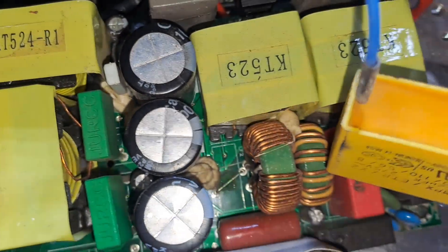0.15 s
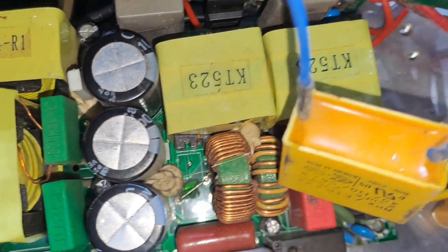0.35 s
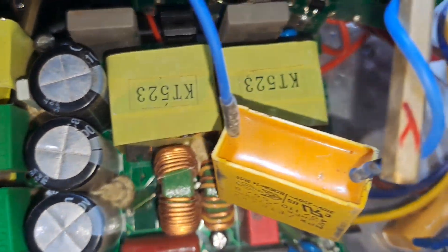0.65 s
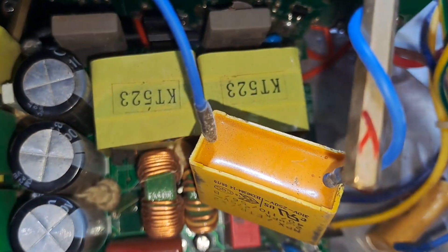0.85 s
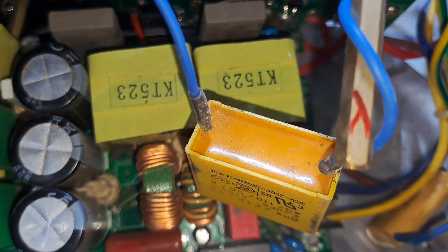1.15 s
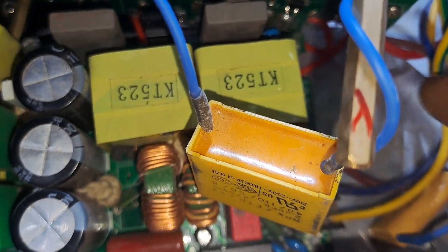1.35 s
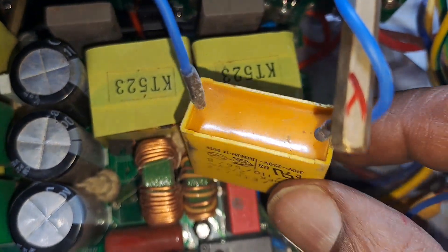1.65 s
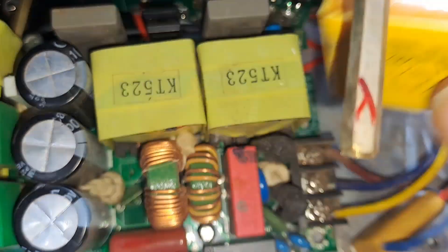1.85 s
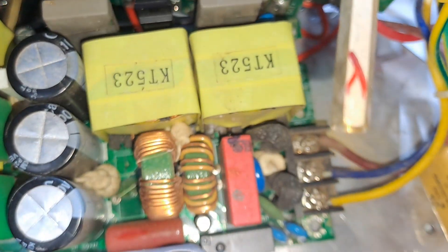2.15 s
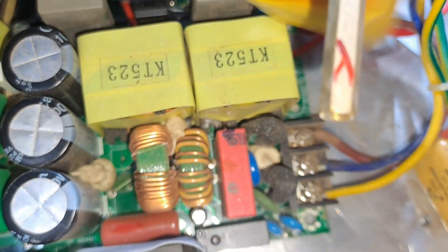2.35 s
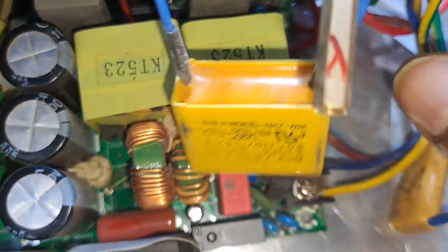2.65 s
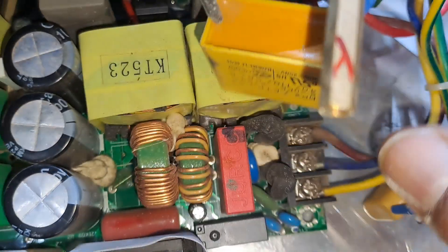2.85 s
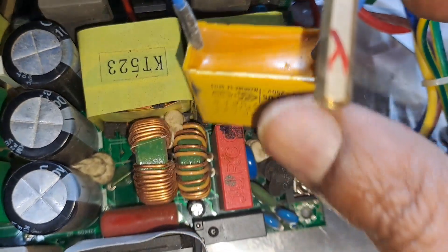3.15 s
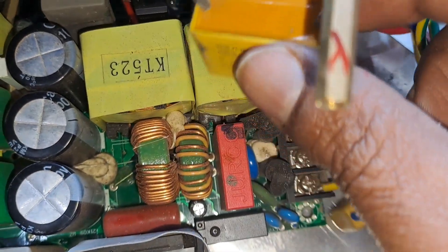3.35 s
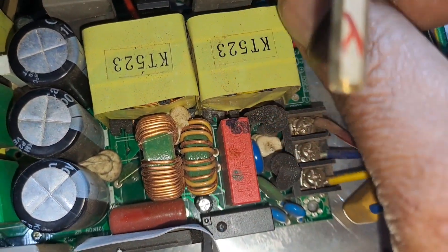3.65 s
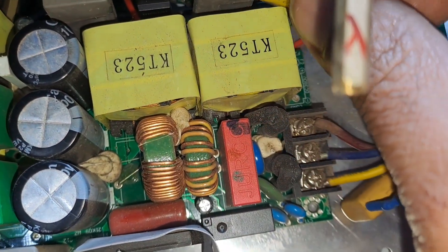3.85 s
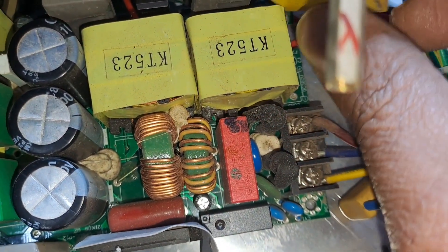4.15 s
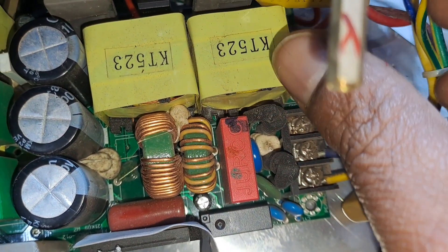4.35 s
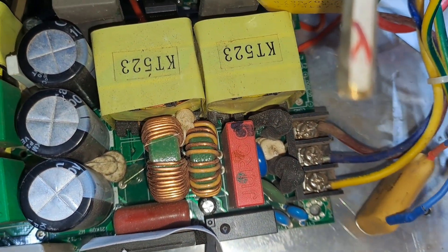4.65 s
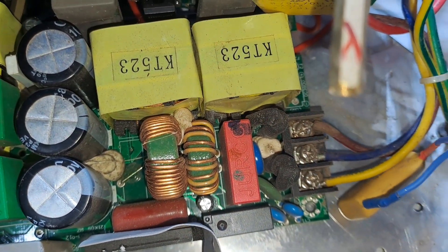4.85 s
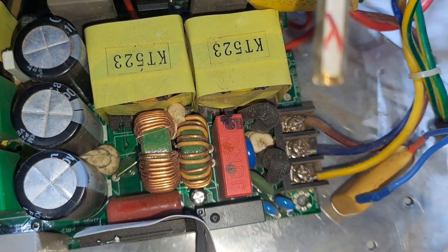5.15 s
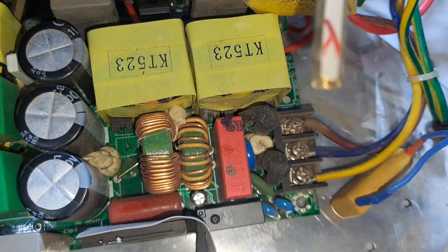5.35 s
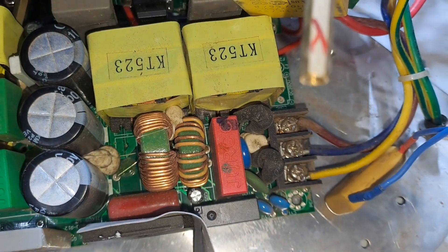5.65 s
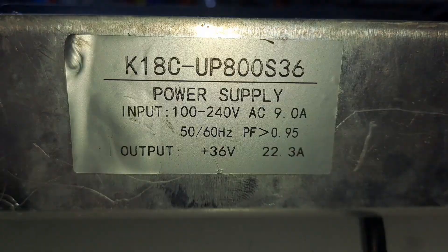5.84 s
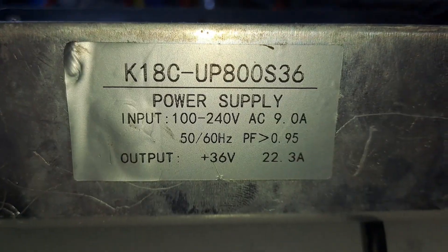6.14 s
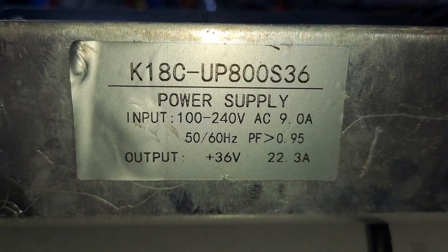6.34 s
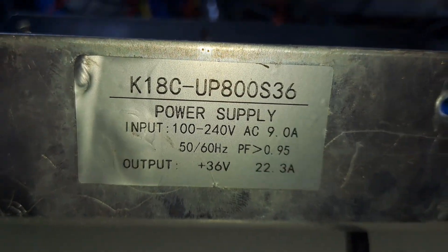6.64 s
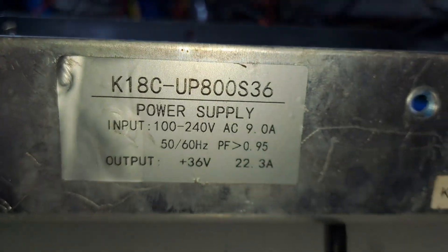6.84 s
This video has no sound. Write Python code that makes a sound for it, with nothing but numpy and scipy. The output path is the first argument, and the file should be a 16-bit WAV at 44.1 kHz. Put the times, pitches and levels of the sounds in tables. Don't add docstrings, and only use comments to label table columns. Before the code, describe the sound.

Close, dry clacks of hard plastic on metal and circuit board, gritty wire scrapes, one sharp microphone tick and a short dull shove.

```python
import sys
import numpy as np
from scipy import signal
from scipy.fft import rfft, irfft, next_fast_len
from scipy.io import wavfile
from scipy.ndimage import uniform_filter1d, map_coordinates

SR = 44100
rng = np.random.default_rng(int(sys.argv[2]) if len(sys.argv) > 2 else 0)


def waveform_to_disk(signal):
    frames = np.transpose(np.atleast_2d(signal))
    scaled = np.clip(frames, -1, 1) * 32767
    samples = np.round(scaled).astype(np.int16)
    wavfile.write(sys.argv[1], SR, samples)


def to_linear_factor(level_db):
    exponent = np.asarray(level_db, float) / 20
    return 10 ** exponent


N = 308391

# start_s, peak_db, left_minus_right_db, body_db (under 1.3 kHz), clink_db (over 2.7 kHz)
BAR_HITS = [(1.42, -25, 0.5, -12.5, -19.5), (1.577, -21.5, -0.5, -15, -18.5), (1.722, -32.5, 2, -13, -42.5),
            (1.745, -26, 2, -7, -19), (1.938, -32.5, 3.5, -11.5, -4), (2.024, -41.5, 3, 0, -11),
            (2.035, -6.5, 1.5, -20.5, -6), (3.297, -29.5, 6.5, -9.5, -14), (3.349, -19, 5.5, -12.5, -24),
            (3.398, -30.5, 8, -6.5, -22.5), (3.41, -30.5, 7, -19.5, -15), (3.463, -37.5, 4.5, -7, -18),
            (4.637, -38.5, 5, -13.5, -21)]
BOARD_HITS = [(2.477, -36, 5.5, -9, -10), (3.148, -41.5, -6.5, -3.5, -9), (3.157, -21.5, 5, -13.5, -17),
              (3.512, -37.5, -7, -21, -6.5), (3.526, -15.5, 7, -14.5, -17), (3.542, -21, -3, -10.5, -2.5),
              (3.554, -26.5, 9.5, -15.5, -16), (3.575, -23, 8.5, -20.5, -7.5), (3.604, -27, -3, -8.5, 0.5),
              (3.647, -6, 3, -19.5, -6.5), (3.755, -32, 9, -16, -18.5), (4.063, -22, 5, -7, -13),
              (4.22, -19, 4, -11, -21)]
TRAY_HITS = [
    (1.107, -38, -5.5, -20, -6),
    (1.227, -22.5, -2.5, -3.5, -13),
    (1.755, -37, 14.5, -11.5, -22),
    (3.848, -17, -3, 1, -25),
    (3.857, -23, 6, -2, -40),
    (4.344, -12, -1, -4, -17),
    (4.358, -16, -8, -15, -30.5),
    (4.367, -23, 1.5, -5, -20),
]
WIRE_TICKS = [
    (1.112, -27, -5.5, -25, -10),
    (1.136, -33.5, -0.5, -4, -6),
    (1.319, -39, -9, -14, -6.5),
    (1.342, -39, -7.5, -18, -2.5),
    (2.776, -18, -8.5, -30, -13.5),
    (4.52, -41.5, -7.5, -17, -11),
    (4.562, -29.5, -15.5, -30, -14.5),
    (5.648, -52, -11, -0.5, -16),
]
# pitch_hz, level_db, t60_s (time to fall 60 dB)
BAR_MODES = [(1050, -4, 0.1), (1212, -6, 0.047), (1914, -9.5, 0.059), (2329, -17, 0.059),
             (3190, -8.5, 0.038), (3980, 10.5, 0.028), (4300, -15.5, 0.029), (5320, -1.5, 0.065),
             (6000, 1, 0.02), (6337, -6, 0.078)]
BOARD_MODES = [(1042, 10, 0.079), (1200, -10, 0.028), (1475, 7.5, 0.059), (1893, -6, 0.04),
               (2630, -15, 0.04), (3100, -12, 0.045), (3270, 0, 0.045), (4210, -6, 0.038), (6000, -4, .02),
               (6770, 0.5, 0.03)]
TRAY_MODES = [(270, -15, 0.076), (669.6, 1, 0.045), (791, -2, 0.08), (880, 7, 0.09), (1094, -3, 0.062),
              (1280, -2.5, 0.042), (2010, -1, 0.02), (2177, -17, 0.06), (3000, -11, 0.016),
              (4398, -8, 0.0347)]
WIRE_MODES = [(2900, -8, .015), (3870, -14, .05), (4790, -6, .012), (5600, -10, .012), (7200, -10, .01),
              (11800, -8, .012)]
# base_db, change_per_clink (dB per dB), change_per_body (dB per dB)
BAR_EDGE = (-34, 0.13, .05)
BOARD_EDGE = (-18, 0.85, -0.33)
TRAY_EDGE = (-30, 1, -.5)
WIRE_EDGE = (-15.5, -0.056, -0.52)

# start_s, peak_db, pitch_hz
BUMPS = [(2.094, -32, 987), (2.161, -38.5, 1230), (2.174, -28, 1035), (2.189, -33.5, 1056),
         (2.287, -39, 990), (2.3, -30, 1027), (2.316, -35, 1050), (2.388, -37.5, 1200), (2.411, -40.5, 791),
         (2.448, -34, 788), (2.474, -34, 1200), (2.496, -41, 796)]
BUMP_T60_S, BUMP_SIDE_DB = 0.045, 2.5

# start_s, end_s, level_db, tilt_db (per octave), left_minus_right_db
DRAGS = [
    (1.04, 1.09, -48, 8, -5),
    (2.385, 2.435, -48.5, 4, 7.5),
    (2.475, 2.505, -52.5, 7, 9.5),
    (2.515, 2.54, -48.5, 9, 8.5),
    (2.74, 2.757, -47.5, 5, 3.5),
    (4.03, 4.06, -59, 1.5, 8.5),
    (5.01, 5.12, -63, 1.5, 0.5),
    (6.235, 6.27, -66, 4, 3.5),
    (6.55, 6.6, -63, -2, -36),
]
# start_s, end_s, level_db, tilt_db (per octave), left_minus_right_db
SWEEPS = [
    (.15, .21, -58, 0.5, -40),
    (.71, .81, -60, 6.5, -28),
    (2.7, 2.95, -52, 5, -1),
    (4.17, 4.22, -60, 9, 0),
    (5.32, 5.44, -68.5, -1, 1),
    (6.8, 7, -68, 2, 1.5),
]
# start_s, end_s, level_db, tilt_db (per octave)
GRINDS = [(.97, 1.06, -53, 2.5), (1.02, 1.1, -46.5, -2), (1.1, 1.36, -49.5, -3), (1.53, 1.7, -58, -3.5),
          (1.36, 1.5, -58, -1.5), (1.76, 1.81, -57, -3), (1.905, 2.03, -53.5, -1.5),
          (2.245, 2.33, -58.5, -3), (2.9, 3.05, -65, -1.5), (3.16, 3.215, -53, -2.5),
          (5.41, 5.56, -62.5, -2), (4.5, 4.7, -63, -1), (2.15, 2.185, -43, -2), (3.215, 3.295, -51, 0.5),
          (3.622, 3.648, -31.5, -1.5), (4.15, 4.22, -58, 1)]
# start_s, end_s, level_db, tilt_db (per octave)
BRUSHES = [
    (.17, .3, -44.5, 0.5),
    (.3, .54, -53, 0.5),
    (.7, .8, -56.5, 6),
    (1.1, 1.17, -39.5, -0.5),
    (1.23, 1.29, -35, -1),
    (1.94, 2.1, -45.5, -0.5),
    (2.4, 2.53, -43, -6),
    (5.42, 5.58, -52, 8.5),
]
# left_minus_right_db, fade_s, fade_per_length (s per s), fade_out_over_fade_in
CATCH = (0, .004, 0.033, 1.501)
SWELL = (0, .001, 0.32, 1.099)
ROUGH = (1.7, .004, .1, 1.8)
SOFT = (-1, .008, .07, 5)
# pitch_hz, level_db
SCRAPE = [(88, -31), (150, -10.5), (504, -13.5), (730, -3.5), (1100, -13), (2270, -8.5), (5460, -8.5),
          (16000, -27)]
SLEEVE = [(59, -7.5), (100, -7.5), (183, -3.5), (335, 0), (1080, -16.5), (1230, -20), (5060, -49.5),
          (8000, -64), (10400, -95), (17600, -120)]
# pitch_hz, width_hz, level_db
WIRE_PEAKS = [(1050, 70, 5), (1450, 70, 5), (1930, 60, 2), (2350, 80, 9), (3050, 70, 13), (3950, 70, 12),
              (5600, 90, 10)]

# start_s, end_s, level_db, pitch_hz, left_minus_right_db
SINGS = [(.965, .99, -56, 5660, 0), (.985, 1.04, -49, 5660, -0.5), (1.42, 1.46, -60, 6245, 3),
         (1.43, 1.46, -61, 5290, 3), (1.0, 1.09, -49.5, 2300, 2.5), (1.048, 1.09, -50.5, 4150, 1),
         (1.05, 1.08, -50, 5100, 0), (1.005, 1.06, -54, 800, -1), (1, 1.2, -46.5, 2100, -1),
         (1.105, 1.15, -52.5, 4100, -1), (1.232, 1.29, -46, 2170, -2.5), (1.5, 1.48, -63, 3980, 3.5),
         (1.43, 1.475, -53, 1960, 4), (1.91, 1.8, -60, 4050, 3), (1.58, 1.61, -58, 4050, 2),
         (5.42, 5.54, -70, 5050, 0), (5.43, 5.54, -64, 2400, 0), (5.43, 5.6, -68, 1700, 0),
         (2.04, 2.08, -37, 1900, 3.5), (2.245, 2.275, -64, 4000, 3.5), (2.09, 2.105, -52, 4400, 3),
         (1.1, 1.085, -54, 3100, 0), (2.28, 2.325, -53, 1500, 2.5), (3.165, 3.2, -51, 1200, 6.5),
         (3.215, 3.29, -57, 4050, 6), (3.16, 3.178, -50, 3050, 6), (3.16, 3.176, -40, 1950, 6),
         (3.218, 3.26, -50, 2100, 6), (3.228, 3.28, -49, 1150, 5), (3.22, 3.25, -53, 3000, 6),
         (3.235, 3.29, -56, 4300, 6), (3.257, 3.285, -41, 3020, 6), (3.24, 3.29, -58, 5800, 6),
         (3.35, 3.365, -49, 4000, 8), (3.625, 3.647, -32.5, 1530, 9.5), (3.63, 3.645, -33.5, 3600, 7.5),
         (3.66, 3.73, -42, 1960, 5), (3.65, 3.68, -36.5, 1110, 4.5), (5.6, 5.11, -69, 5900, 0.5),
         (5.105, 5.118, -67, 1850, 1), (4.56, 4.59, -62, 3900, -10), (3.41, 3.45, -52, 1150, 8)]
# start_s, end_s, level_db,
# pitch_hz, left_minus_right_db
SKIPS = [(1.125, 1.14, -42, 740, 0), (1.114, 1.12, -44, 2200, 0), (1.755, 1.759, -36, 1500, 6),
         (2.025, 2.029, -42, 3100, 4), (1.529, 1.7, -56, 1940, 2.5), (1.2265, 1.234, -34.5, 2480, -4),
         (1.227, 1.232, -42, 12500, -6.5), (2.026, 2.032, -36.5, 1790, 5.5), (2.392, 2.397, -41.5, 4540, 8),
         (2.428, 2.434, -48.5, 4700, 9), (2.448, 2.46, -46, 1000, 6.5), (2.475, 2.487, -41, 1200, 8),
         (2.533, 2.54, -48, 4500, 7.5), (2.946, 2.96, -57.5, 6000, 3), (3.056, 3.066, -59, 5000, -6.5),
         (3.148, 3.152, -42.5, 2500, 7.5), (3.2955, 3.302, -29, 2700, 7), (3.296, 3.299, -38, 5200, 7),
         (3.3245, 3.328, -39, 2700, 6), (3.256, 3.262, -47, 2700, 6), (3.41, 3.416, -50.5, 4500, 9.5),
         (3.5114, 3.515, -38.5, 4525, 1.5), (3.553, 3.556, -32, 1500, 6), (1.745, 1.749, -42, 4900, 5),
         (1.3185, 1.32, -50, 4000, -6), (4.158, 4.161, -52, 1500, 3), (3.576, 3.59, -38.5, 1495, 5),
         (3.603, 3.608, -33, 2800, 1), (3.603, 3.607, -33, 6500, 0), (3.624, 3.646, -41.5, 5600, 4),
         (3.526, 3.529, -40, 8000, 3), (3.647, 3.651, -30, 6700, 5), (1.755, 1.77, -41, 1300, 5),
         (5.647, 5.65, -54.5, 6050, -10), (3.553, 3.555, -46, 9000, 4), (3.604, 3.608, -42, 11000, 0),
         (4.3585, 4.361, -32, 2500, -5), (1.228, 1.245, -36, 1000, -3),
         (6.461, 6.463, -67, 6000, 3),
    (6.474, 6.477, -64, 4500, 3),
    (6.49, 6.493, -65, 5500, 3),
    (2.776, 2.78, -36, 12000, -9),
    (2.7765, 2.78, -36, 4500, -6),
    (2.386, 2.389, -46, 6000, 7),
    (1.936, 1.94, -44, 6000, 3),
]
# width_over_pitch, flank_steepness, grit_db, attack_s, release_s
SING = (.032, .6, 2.5, .006, .012)
SKIP = (.45, 1, 3.5, .0005, .0025)
PORT_GAP_S = 0.00023

# start_s, peak_db, left_minus_right_db, thud_db
PORT_TAPS = [
    (6.186, -64.5, 9.5, 2),
    (6.2312, -28, 13.5, -12.5),
    (6.251, -59.5, -16, 14),
]
# start_s, peak_db, left_minus_right_db, thud_db
SNAPS = [
    (4.84, -24, -41, -12),
    (4.8405, -27, -41, -30),
    (4.84105, -9, -41, -22),
    (4.8419, -25, -41, -13),
    (6.53805, -29, -25, -14),
    (6.53915, -38, -30, -3),
]
PAD_HZ, NAIL_HZ, NAIL_SIDE_DB = 3100, 5350, -19
# start_s, end_s, level_db, tilt_db (per octave)
PORT_RUBS = [
    (4.813, 4.85, -49.5, 2),
    (4.845, 4.911, -40, 1.5),
    (6.605, 6.669, -50, -2),
]
# start_s, end_s, level_db, tilt_db (per octave)
SHOVE = [
    (5.7, 5.797, -28, 0),
]
# left_minus_right_db, fade_s, fade_per_length (s per s), fade_out_over_fade_in
ON_PORT = (-40, .004, 0, .6)
PUSH = (0.36, 0.011, 0.0048, 0.98)
# pitch_hz, level_db
SKIN = [(180, -37), (300, -9), (915, -18.5), (1010, -14.5), (6620, -11.5), (9000, -15.5), (12100, -4.5),
        (16000, -16)]
SHOVED = [(12, -33), (20, -35), (62, 4.5), (150, -11.5), (472, -13.5), (642, -21), (6720, -40),
          (16000, -66)]
# pitch_hz, width_hz, level_db
PORT_PEAKS = [(6590, 700, 8), (11500, 1500, 1)]

# time_s, rumble_db
GRIP = [
    (0.0, -54.5),
    (3.2, -62),
    (3.65, -51),
    (5.14, -69.5),
    (6.62, -56.5),
    (6.99, -74),
]
# time_s, effort_db
EFFORT = [
    (0, -67),
    (0.9, -76),
    (1.2, -62),
    (3.79, -55),
    (4.5, -61),
    (5.1, -78),
    (6.99, -77.5),
]
# level_db (over mean effort), change_per_effort (dB per dB), change_per_stir (dB per dB)
BENCH_HUM = (1.2, .6, 0.57)
TRAY_RING = (-6.5, 0.76, .5)
SKIN_HISS = (-9, 0.64, .45)
STIR_S, STILL_DB = 0.26, -67
# pitch_hz, level_db
RUMBLE = [(18, -46.5), (30, -19.5), (38, -6), (59, -1.5), (81, 2.5), (103, -7.5), (160, -22), (210, -44),
          (350, -120)]
RUSTLE = [(71, -36), (120, -0.5), (172, 0), (371, -3.5), (404, -1), (520, -20.5), (648, -9.5), (705, -15),
          (900, -14), (1170, -40), (1980, -120)]
RINGING = [(350, -39.5), (600, -10.5), (1070, -9.5), (1270, 1.5), (1950, -5), (4500, -21), (5850, -46),
           (9900, -120)]
HISS = [(1470, -38), (2500, -13), (3440, -10), (3860, -3), (4950, 1), (10100, -13), (12900, -10.5),
        (16000, -16.5)]

# time_s, pitch_hz, level_db
DRONE = [
    [(0.12, 95.3, -54), (0.224, 101, -41.5), (0.32, 97, -46.5)],
    [(6.26, 99.2, -50), (6.806, 96.3, -52), (6.88, 94.0, -59)],
]
# pitch_hz, t60_s
ROOM = [(300, 0.68), (2000, 0.4), (10000, 0.13)]
# pitch_hz, level_db
AIR = [(18, -30.5), (30, 1), (91, 0), (752, -32.5), (1600, -36), (6300, -36.5), (7400, -45), (12700, -35.5),
       (15200, -39.5), (16500, -57)]
AIR_DB = -63
# pitch_hz, likeness (0 to 1)
ALIKE = [(60, 0.91), (180, 0.89), (550, 0.54), (1650, 0.017), (4970, 0.067), (15000, 0.0)]


def unit(x):
    return x / np.sqrt(np.mean(x ** 2) + 1e-20)


def along(points, hz):
    f, v = np.transpose(points)
    return np.interp(np.log(hz + 1), np.log(f + 1), v)


def control(rows):
    return np.interp(np.arange(N) / SR, *np.transpose(rows))


def sides(pan_db):
    left = to_linear_factor(pan_db)
    return 2 * np.array([[left], [1]]) / (1 + left)


def add(out, s, x):
    k = round(s * SR)
    out[:, k:k + x.shape[1]] += x[:, :out.shape[1] - k]


def colour(spectrum, tilt_db=0., peaks=()):
    def gain(hz):
        tilted = to_linear_factor(along(spectrum, hz) + tilt_db * np.log2((hz + 50) / 2000))
        rings = sum(to_linear_factor(db) / (1 + (2 * (hz - centre) / width) ** 2) for centre, width, db in peaks)
        return tilted * (1 + rings)
    return gain


def noise(n, gain, patchy_db, grit_db=0.):
    long = n + 512
    grit = to_linear_factor(grit_db * uniform_filter1d(rng.standard_normal(long), size=24) * np.sqrt(24))
    z = signal.stft(grit * rng.standard_normal((2, long)), nperseg=256)[2]
    field = uniform_filter1d(rng.standard_normal(z.shape[1:]), size=4, axis=0)
    field = uniform_filter1d(field, size=12, axis=1)
    pair = signal.istft(z * to_linear_factor(patchy_db * unit(field)), nperseg=256)[1]
    m = next_fast_len(n + 4096)
    hz = np.fft.rfftfreq(m, 1 / SR)
    turn = np.arccos(np.clip(along(ALIKE, hz), -1, 1)) / 2
    spectrum = rfft(pair, m) * gain(hz) * [np.cos(turn), np.sin(turn)]
    mid, side = irfft(spectrum, m)[:, 256:n + 256]
    return unit(np.array([mid + side, mid - side]))


def knocks(hits, modes, edge, gain_db, crack_db, fuzz_db, scatter_db, blur, detune):
    out, t = np.zeros((2, N)), np.arange(SR // 9) / SR
    hz, level, t60 = np.transpose(modes)[:, :, None]
    for s, db, pan_db, body_db, clink_db in hits:
        top_db = np.dot(edge, [1, clink_db, body_db])
        shape = [(900, body_db), (1900, min(0, -clink_db)), (4200, clink_db), (10000, top_db)]
        own = to_linear_factor(level / 2 + along(shape, hz) + scatter_db * rng.standard_normal(hz.shape))
        jitter = uniform_filter1d(rng.standard_normal((len(hz), len(t))), size=60)
        wander = blur * np.cumsum(jitter, axis=1) / np.sqrt(SR)
        tone = 2 * np.pi * hz * (1 + detune * rng.standard_normal(hz.shape)) * t + wander
        lead = rng.uniform(-0.88, 1, hz.shape) * np.clip(hz / 700, 0, np.pi / 2)
        decay = own * to_linear_factor(-60 * t / t60)
        ring = np.array([np.sum(decay * np.sin(tone + ear * lead), axis=0) for ear in (1, -1)])
        burst_colour = colour([(250, -60), (500, body_db), *shape, (16000, top_db)], 0.12)
        burst = noise(len(t), burst_colour, 0.29) * to_linear_factor(max(body_db, clink_db))
        crack = to_linear_factor(crack_db - 60 * t / 0.013) * burst
        rattle = to_linear_factor(fuzz_db - 60 * t / 0.073) * signal.lfilter([0.3], [1, -0.7], burst)
        contact_s = 0.000066 * to_linear_factor(-0.4 * top_db)
        blow = (ring + crack + rattle) * (1 - np.exp(-(t / contact_s) ** 2))
        blow = sides(pan_db) * blow
        add(out, s, to_linear_factor(db + gain_db) * blow / np.abs(np.mean(blow, axis=0)).max())
    return out


def struck_parts():
    bar = knocks(BAR_HITS, BAR_MODES, BAR_EDGE, -2.2, 6, 2, 1.5, 24, 0.012)
    board = knocks(BOARD_HITS, BOARD_MODES, BOARD_EDGE, -2.5, 11, -0.62, 2.2, 20, 0.011)
    tray = knocks(TRAY_HITS, TRAY_MODES, TRAY_EDGE, -2.5, 11, 1.5, 2.4, 30, 0.0068)
    wire = knocks(WIRE_TICKS, WIRE_MODES, WIRE_EDGE, -3, 9, -5, 2.5, 30, 0.017)
    return bar + board + tray + wire


def bumps():
    out, t = np.zeros((2, N)), np.arange(SR // 10) / SR
    for s, db, hz in BUMPS:
        wander = 9 * np.cumsum(rng.standard_normal(len(t))) / np.sqrt(SR)
        tone = 2 * np.pi * hz * (0.97 * t + 1.2 * t ** 2) + wander
        swell = to_linear_factor(-60 * t / BUMP_T60_S) * (1 - np.exp(-t / 0.0031))
        note = np.sin([tone + 0.72, tone - 0.6]) * swell
        add(out, s, to_linear_factor(db + 3.0) * sides(BUMP_SIDE_DB) * note)
    return out


def strokes(rows, touch, spectrum, patchy_db, grit_db, peaks=()):
    out = np.zeros((2, N))
    side_db, fade_s, per_length, lingers = touch
    for start, end, db, tilt_db, *own_db in rows:
        fade = abs(fade_s + per_length * (end - start)) + 1 / SR
        t = np.arange(round((end - start + fade + fade * lingers) * SR)) / SR
        contact = np.clip(np.minimum(t, (t[-1] - t) / lingers) / (2 * fade), 0, 1) ** 2
        grabbed = [(hz, width, top_db - 2 - 3.5 * rng.exponential()) for hz, width, top_db in peaks]
        rub = noise(len(t), colour(spectrum, tilt_db, grabbed), patchy_db, grit_db)
        add(out, start - fade, to_linear_factor(db) * sides(side_db + sum(own_db)) * contact * rub)
    return out


def rasps(rows, manner):
    out = np.zeros((2, N))
    wide, steep, grit_db, attack_s, release_s = manner
    for start, end, db, hz, pan_db in rows:
        t = np.arange(round((abs(end - start) + 4 * release_s) * SR)) / SR

        def ring(f):
            return (1 + ((f * f - hz * hz) / (f + 1) / (wide * hz)) ** 2) ** -steep

        rub = noise(len(t), ring, 1.2, grit_db)[0]
        rub = rub / np.std(rub[t < abs(end - start) + release_s])
        release = np.exp(-np.maximum(t - (end - start), 0) / release_s)
        rub = rub * np.clip(t / attack_s, 0, 1) * release
        add(out, start, to_linear_factor(db) * sides(pan_db) * [rub, np.roll(rub, round(PORT_GAP_S * SR))])
    return out


def rubbed_parts():
    out = strokes(DRAGS, CATCH, SCRAPE, 2.1, 3.7)
    out += strokes(SWEEPS, SWELL, SCRAPE, 2.2, 1.5)
    out += strokes(GRINDS, ROUGH, SCRAPE, 3.6, 3.0, WIRE_PEAKS)
    out += strokes(BRUSHES, SOFT, SLEEVE, 0.75, 1.6)
    return out + rasps(SINGS, SING) + rasps(SKIPS, SKIP)


def port_taps():
    out, t = np.zeros((2, N)), np.arange(SR // 20) / SR

    def thump(hz, t60):
        return np.sin(2 * np.pi * hz * t) * to_linear_factor(-60 * t / t60)

    for s, db, pan_db, thud_db in PORT_TAPS + SNAPS:
        hz = NAIL_HZ if pan_db < NAIL_SIDE_DB else PAD_HZ
        u = t - 0.0003
        whistle = np.sin(2 * np.pi * hz * u) + 0.7 * np.sin(2 * np.pi * 11500 * u)
        width_s = 0.00015 / min(1, hz / NAIL_HZ)
        spike = -whistle * np.exp(-(u / width_s) ** 2)
        fizz = 0.081 * to_linear_factor(-60 * t / 0.005) * rng.standard_normal(len(t))
        push = thump(900, 0.0044) + 1.1 * thump(330, 0.0077)
        rock = (pan_db > 0) * (4.2 * thump(75, 0.023) + 1.5 * thump(480, 0.023))
        add(out, s, to_linear_factor(db + 3.5) * sides(pan_db) * (spike + fizz + to_linear_factor(thud_db) * (push + rock)))
    return out


def phone_contacts():
    rubs = strokes(PORT_RUBS, ON_PORT, SKIN, 1.4, 1.9, PORT_PEAKS)
    shove = strokes(SHOVE, PUSH, SHOVED, 1.2, 3.5)
    return port_taps() + rubs + shove


def hands(parts):
    effort_db = control(EFFORT)
    power = np.abs(uniform_filter1d(np.mean(parts ** 2, axis=0), size=512))
    now_db = 10 * np.log10(power + to_linear_factor(2 * STILL_DB))
    stir_db = uniform_filter1d(now_db, round(STIR_S * SR))
    mean_db = effort_db.mean()

    def layer_gain(layer):
        db, grows, stirs = layer
        return to_linear_factor(mean_db + db + grows * (effort_db - mean_db) + stirs * (stir_db - stir_db.mean()))

    shudder = to_linear_factor(map_coordinates(rng.standard_normal(200), [np.arange(N) * 18 / SR]))
    grip = to_linear_factor(control(GRIP) + 1.0) * unit(shudder * noise(N, colour(RUMBLE), 0))
    bench = layer_gain(BENCH_HUM) * unit(shudder * noise(N, colour(RUSTLE), 2.5, 1.5))
    tray = layer_gain(TRAY_RING) * noise(N, colour(RINGING, 1.4, WIRE_PEAKS), 4, 4)
    skin = layer_gain(SKIN_HISS) * noise(N, colour(HISS), 2.8, 4.5)
    return grip + bench + tray + skin


def room(x):
    out, step = np.zeros((2, N)), SR // 2
    for k in range(0, N, step):
        hz, t, z = signal.stft(rng.standard_normal((2, step)), SR, nperseg=256)
        fading = z * to_linear_factor(-60 * t / along(ROOM, hz)[:, None])
        tail = signal.istft(fading, SR, nperseg=256)[1]
        tail = tail / np.linalg.norm(tail[0])
        add(out, k / SR + 0.0049, signal.fftconvolve(x[:, k:k + step], tail, axes=1))
    return out


def drone():
    out, t = np.zeros(N), np.arange(N) / SR
    for rows in DRONE:
        s, hz, db = np.transpose(rows)
        edge = np.clip(np.minimum(t - s[0], s[-1] - t) / 0.0061, 0, 1)
        phase = 2 * np.pi * np.cumsum(np.interp(t, s, hz)) / SR
        out += edge * to_linear_factor(np.interp(t, s, db)) * np.sin(phase)
    return out


def air():
    return to_linear_factor(AIR_DB) * noise(N, colour(AIR), 1.8)


def scene():
    parts = struck_parts() + bumps() + rubbed_parts()
    echo = to_linear_factor(-14.5) * room(parts)
    return parts + echo + phone_contacts() + hands(parts) + drone() + air()


def roll_off(x):
    return signal.sosfilt(signal.butter(12, 16810, fs=SR, output="sos"), x)


def record(dry):
    band = signal.butter(3, [42, 17000], "bandpass", fs=SR, output="sos")
    top = signal.butter(16, 15900, fs=SR, output="sos")
    heard = signal.sosfilt(top, signal.sosfilt(band, dry))
    heard = heard / (1 + np.abs(heard / 0.9) ** 6) ** (1 / 6)
    return roll_off(heard)


dry = scene()
out = record(dry)
waveform_to_disk(out)
```